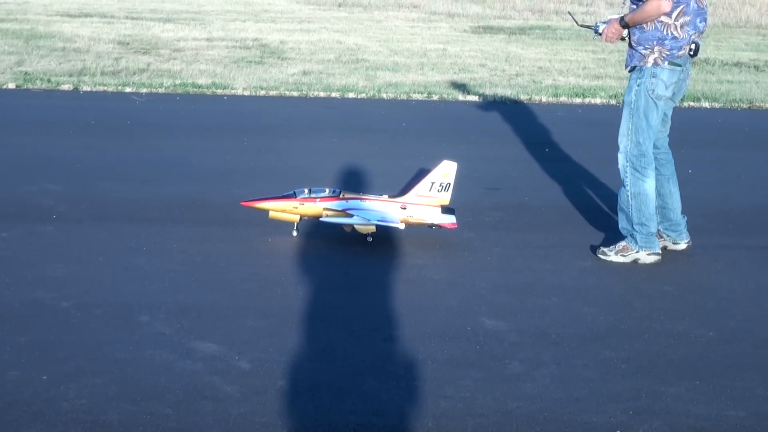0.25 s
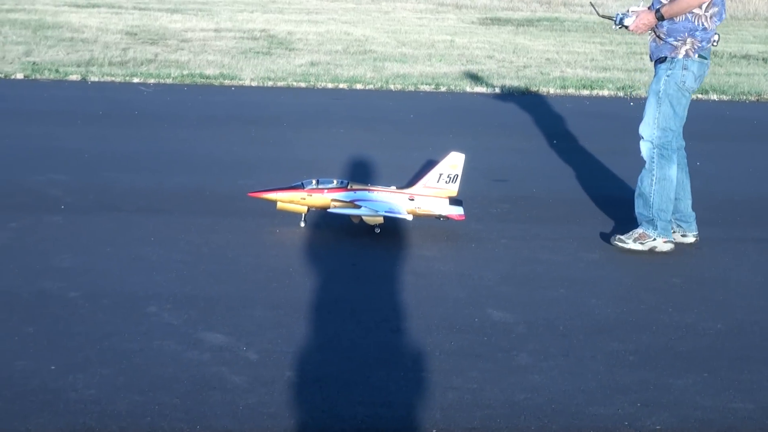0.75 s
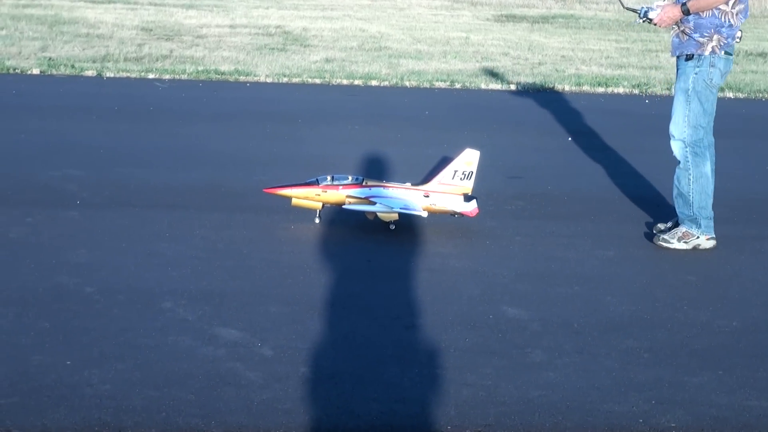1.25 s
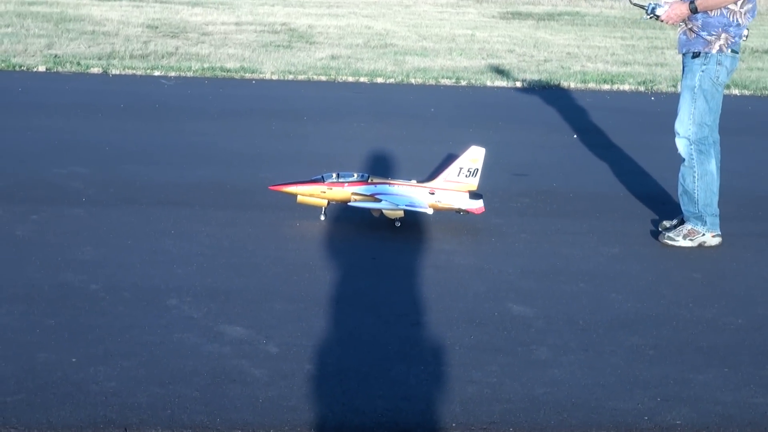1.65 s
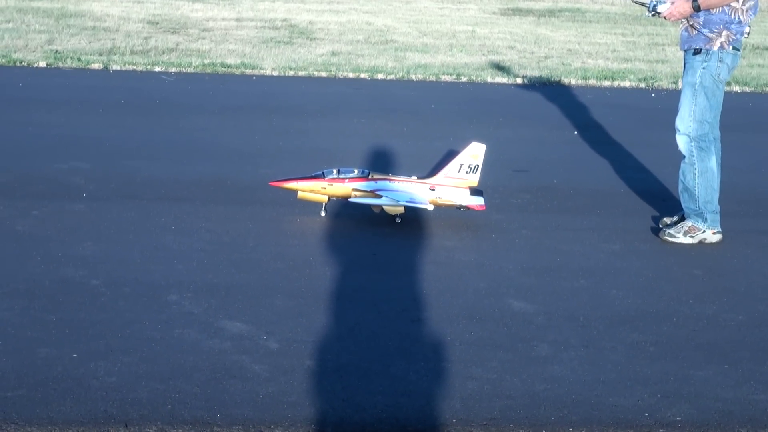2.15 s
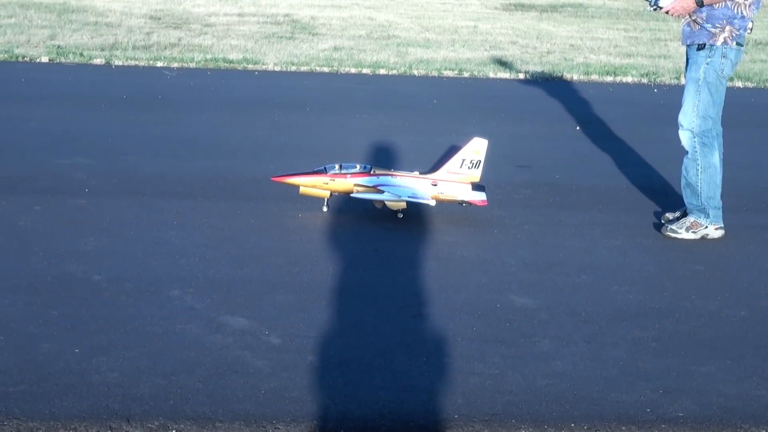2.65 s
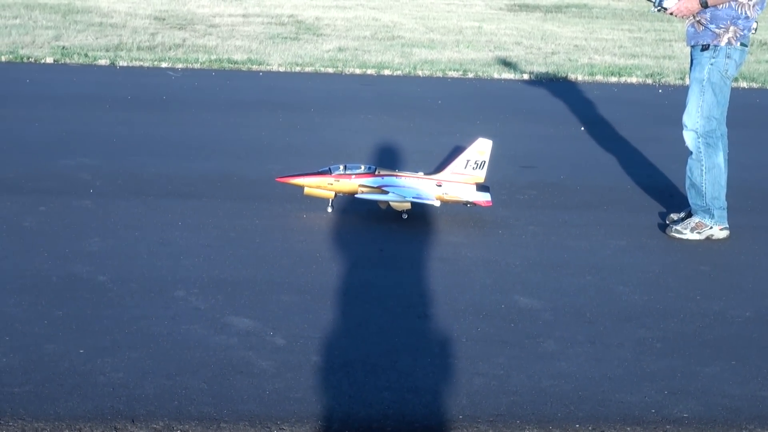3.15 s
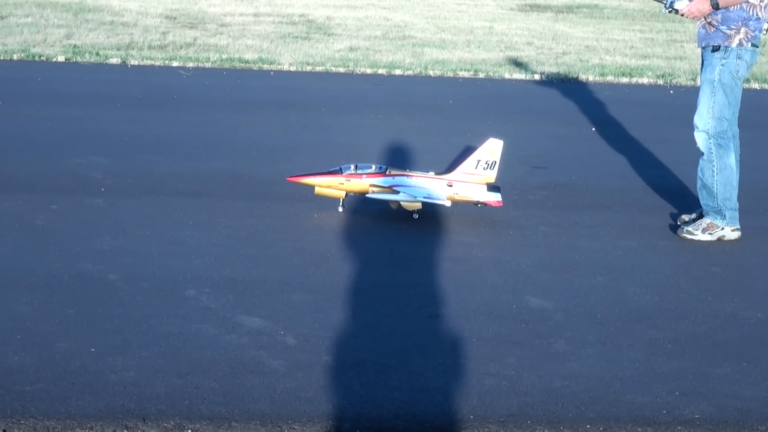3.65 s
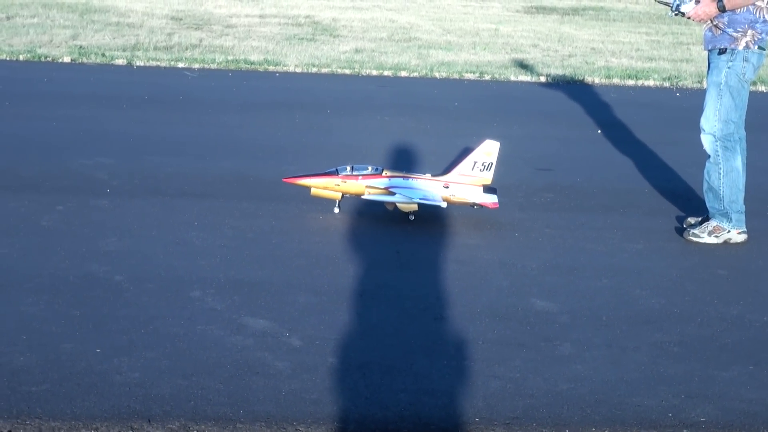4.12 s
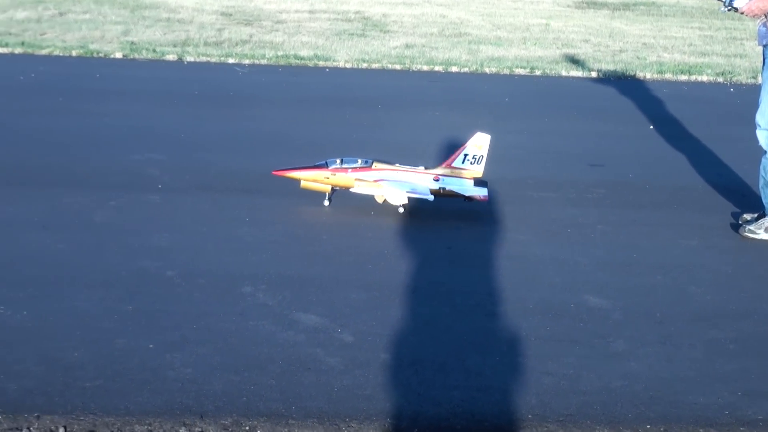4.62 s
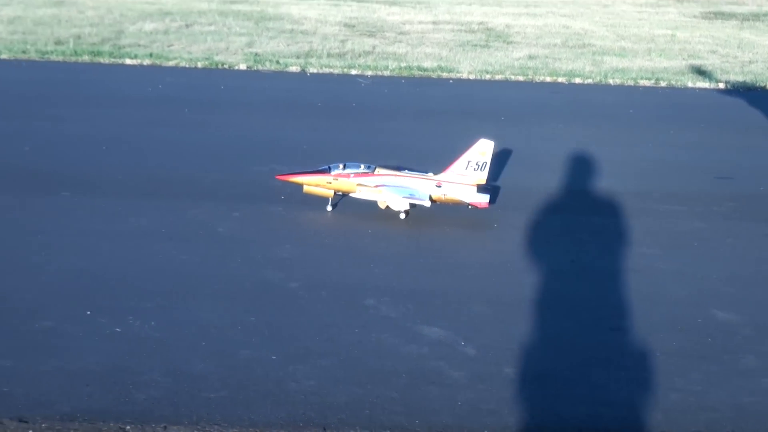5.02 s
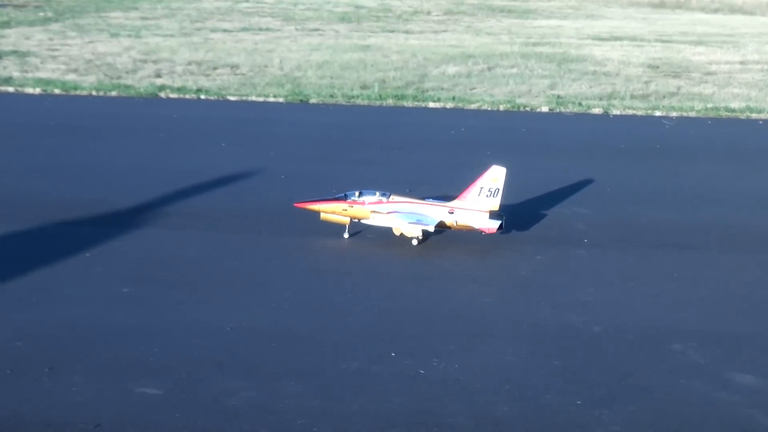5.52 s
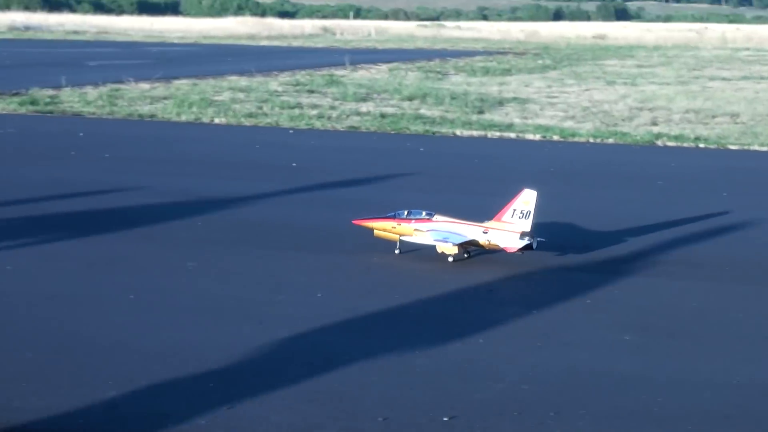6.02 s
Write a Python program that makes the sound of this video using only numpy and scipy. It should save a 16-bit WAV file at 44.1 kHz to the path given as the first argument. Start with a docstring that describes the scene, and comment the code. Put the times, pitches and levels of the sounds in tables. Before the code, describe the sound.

A soft, low camera hum close to the stereo microphone and a faint outdoor rush run throughout. A few metres away, a model jet's servos give one brief whirr at the very start, then a string of short, faint, squeaky gear buzzes from about 0.6 to 1.9 seconds, with four light linkage clicks between 1.3 and 1.9 seconds. Only the hum and quiet air remain until about 3.5 seconds, when the electric motor starts with a rapid stutter of high squeals, rattles and chirps. From 3.7 seconds the fan spools up, much louder than the servos: a whine of several tones that rises quickly, then climbs in steps over a swelling rush and hiss of air. It keeps growing higher and louder, with the middle of the sound softening slightly after 5.8 seconds as the jet rolls past. The fan is still whining at the end, around 6.3 seconds.

```python
"""Model jet on a runway

An electric ducted-fan jet stands a few metres from a humming camcorder's stereo microphone.
Its servos whirr through a control check; the motor stutters and chirps into step, then the
five-bladed fan spools up, whining over the rush of air in its duct, and the jet starts to roll."""
import sys
import numpy as np
from scipy.fft import rfft, irfft, next_fast_len
from scipy.io import wavfile
from scipy.ndimage import uniform_filter1d, map_coordinates

SR = 44100
rng = np.random.default_rng(int(sys.argv[2]) if len(sys.argv) > 2 else 0)


def inscribe(sig):
    """Save sig as 16-bit PCM at rate SR to the path in sys.argv[1].

    A 1-D sig is mono; a 2-D sig holds one channel per row.
    Samples are clipped to [-1, 1] before scaling.
    """
    pcm = np.round(np.clip(np.atleast_2d(sig).T, -1, 1) * 32767)
    wavfile.write(sys.argv[1], SR, pcm.astype(np.int16))


N = 276948
TIME = np.arange(N) / SR
CRUISE_HZ = 500  # shaft speed at which the fan's levels are set
HISS_DB, HISS_DB_PER_OCTAVE = -38.5, 20  # exhaust hiss at cruise, and its growth with speed
TURN_AWAY_S = 5.76  # the intake turns from the microphone as the jet rolls past

# shaft speed until the motor runs in step, then as the throttle opens in steps: t/s, f/Hz
FIRST_TURNS = [(3.525, 35.1), (3.587, 120.1), (3.612, 151.2)]
SPOOL_UP = [(3.66, 208.3), (3.74, 272.8), (3.82, 304.6), (3.969, 325.4), (4.16, 331.6), (4.28, 378.3),
            (4.409, 410.8), (4.58, 421), (4.721, 443.8), (5.03, 520.1), (5.4, 569.3), (5.58, 586.8),
            (5.64, 603.6), (5.697, 606.4), (5.77, 634), (5.87, 641.5), (6.0, 654), (6.05, 689.3),
            (6.16, 694), (6.19, 704), (6.28, 703.5)]
# how each part of the jet radiates the fan's tones: f/Hz, level at cruise/dB
AIRFRAME = [(220, -39), (330, -34.5), (395, -32), (425, -39), (445, -34), (490, -36.5), (513, -50),
            (555, -31), (595, -37), (635, -23), (705, -26.5)]
DUCT_MOUTH = [(620, -40), (760, -31.5), (880, -36), (1000, -51), (1200, -48), (1310, -38), (1450, -49),
              (1565, -37.5), (1650, -40.5), (1730, -41), (1916, -46.5), (2110, -45)]
INTAKE = [(1150, -41), (1320, -31.5), (1560, -27), (1800, -35.5), (2070, -25.5), (2190, -35.5), (2400, -28),
          (2620, -35), (2750, -31.5), (2920, -43), (3170, -35.5), (3520, -33)]
NOZZLE = [(3350, -49), (3720, -41.5), (4050, -56.5), (4850, -47), (5450, -58), (6050, -42.5), (6850, -45.5),
          (7350, -35), (8100, -45), (8750, -43), (9100, -33.5), (9600, -42), (9900, -40), (10350, -34.5)]
# weak tones of the uneven rotor: shaft multiple, level against the hiss before the duct/dB
ROTOR_TONES = [(7, -9.5), (9, -6.5)]
# tones that swell as the motor pulls: shaft multiple, level at cruise before the duct/dB
STRAIN_TONES = [(2, -52), (4, -53), (6, -47.5)]
# highest blade tones: shaft multiple, level against the hiss before the roll-off/dB
TOP_BLADE_TONES = [(20, -14.5), (25, -25), (30, -15)]
# the nozzle's roll-off for those tones: f/Hz, gain/dB
NOZZLE_ROLLOFF = [(12000, 0), (13000, -12), (14200, -5), (15500, -20)]
# resonances of the duct's air, fan unit, motor casing and servo cases: f/Hz, width/Hz, gain/dB
DUCT_MODES = [(845, 198, 6.5), (1412, 407, 7.5), (2094, 145, 3), (2683, 87, -2.5), (3400, 250, -7.5),
              (4710, 660, -8), (5850, 270, -10.5), (7200, 290, -7.5)]
FAN_UNIT_MODES = [(813, 70, 7), (1500, 200, 9), (2140, 170, 6), (2630, 120, 3), (3280, 100, -13),
                  (4360, 170, -6)]
CASING_MODES = [(1600, 1400, -14), (2230, 290, -3), (2720, 280, 1), (3420, 400, -6.5), (4640, 440, -8.5)]
SERVO_MODES = [(2020, 350, -4), (3740, 500, -2), (4950, 500, 5.5), (6240, 430, 7), (6940, 380, 5.5),
               (8000, 300, -1), (9130, 790, 4), (10000, 370, 0), (11300, 700, 1), (12650, 450, -4)]
# noise spectra of the exhaust and the quiet airfield: f/Hz, relative level/dB
EXHAUST_SPECTRUM = [(60, -45), (230, 2.5), (550, -0.5), (900, 8), (1200, -18), (3500, 7.5), (4800, -1.5),
                    (5500, -7.5), (6300, 2.5), (8200, 2), (10300, 4), (12500, -0.5), (13200, -19),
                    (13800, -6), (14600, -16), (15400, -14), (16200, -24)]
AIRFIELD_SPECTRUM = [(15, -58), (25, -19), (59, -14.5), (89, -11), (120, -10), (170, -8), (301, -11),
                     (344, -11.5), (405, -11.5), (463, -9.5), (695, -16.5), (2840, -30), (4610, -33.5),
                     (9000, -38), (12500, -38), (16000, -41)]
# speed controller's current bursts: t/s, length/s, first f/Hz, last f/Hz, squeal/dB, rattle/dB
CURRENT_BURSTS = [(3.476, 0.0065, 3000, 2920, -40.5, -41), (3.484, 0.02, 2980, 2960, -51.5, -61),
                  (3.505, 0.035, 3020, 3000, -42, -33.5), (3.54, 0.02, 3070, 3100, -41, -35.5),
                  (3.559, 0.022, 3370, 3350, -32, -39), (3.577, 0.0176, 3925, 3904, -40.5, -40),
                  (3.596, 0.0205, 4980, 4950, -38.5, -32.5), (3.615, 0.023, 3750, 3720, -54, -35.5),
                  (3.616, 0.017, 4680, 4220, -43, -43), (3.633, 0.025, 3300, 3470, -53, -38.5),
                  (3.658, 0.042, 2050, 2260, -47, -50)]
# how the windings radiate the squeal's harmonics: f/Hz, highest level/dB
WINDINGS = [(4600, -69), (6050, -48.5), (6800, -82), (7500, -48), (7900, -56), (8950, -60.5),
            (10000, -56.5), (10700, -68), (11700, -48), (12100, -74), (15000, -85)]
# control check: start t/s, fastest t/s, end t/s, top mesh f/Hz, whirr/dB, rasp/dB, airframe buzz/dB
SERVO_MOVES = [(-.04, 0.033, .082, 1684, -54.5, -57.5, -63),
               (0.609, 0.661, 0.72, 1583, -58.5, -56.5, -60.5),
               (0.748, 0.816, 0.9, 2490, -53, -54.5, -55.5), (.967, 1.044, 1.11, 2520, -54, -56.5, -55.5),
               (1.12, 1.172, 1.24, 1700, -55, -59.5, -58), (1.194, 1.248, 1.283, 1094, -54.5, -61.5, -58),
               (1.337, 1.374, 1.395, 1680, -65, -67, -63), (1.384, 1.452, 1.564, 2690, -61, -56.5, -53),
               (1.629, 1.733, 1.79, 1263, -59, -59, -54.5), (1.801, 1.855, 1.895, 2200, -63.5, -61, -55)]
# servo gear tones: mesh multiple, relative level/dB
GEAR_TONES = [(1, -1), (2, 1), (3, -4), (4, 6.5), (5, -6), (6, 2.5), (7, -20), (8, -7), (10, -6)]
# linkages reach the end of their travel: t/s, level/dB
LINKAGE_STOPS = [(1.262, -52), (1.483, -42), (1.772, -47.5), (1.877, -40.5)]
# hum of the camcorder's drive, right by the microphone: t/s, level/dB
HUM_SWELL = [(0.0, -48.5), (0.6, -49), (1.4, -52.5), (2.3, -50.5), (3.4, -52), (4.2, -47.5), (6.28, -48.5)]
# its harmonics: multiple, level against the hum/dB
HUM_TONES = [(1, -0.5), (2, -17.5), (3, -13), (4, -15.5)]
# its gearing: f/Hz, level/dB
DRIVE_WHINE = [(510, -71.5), (571, -80), (2439, -80.5)]
# a whine that dies away: t/s, level/dB
FADING_WHINE = [(0, -75), (.8, -73), (1.6, -85), (3.4, -88)]
# a thin idle whistle that sags in pitch: t/s, f/Hz
WHISTLE_PITCH = [(0, 2970), (.8, 2980), (1.9, 2860), (3.4, 2890)]
# its harmonics: multiple, level/dB
WHISTLE_TONES = [(1, -77.5), (2, -82)]
# stereo image of the jet and of the camcorder's own sounds: f/Hz, side/dB, left over right/dB
JET_IMAGE = [(290, -15, 0.5), (650, -23, -0.5), (1800, -24, -1.2), (5000, -20, -0.7), (9000, -18.5, 0)]
NEAR_IMAGE = [(123, -60, 0.5), (556, -4, 2.5), (4900, -1.5, -0.1)]


def fan_tones(growth_db_per_octave=11.5, strain_db_per_octave=14.5, hard_pull_octaves_per_s=0.96):
    """Rotor imbalance sings at shaft speed, the blades at its multiples, swelling at each resonance."""
    shaft_hz, octaves = shaft_speed()
    shaft = angle(shaft_hz)
    hiss_db = HISS_DB + HISS_DB_PER_OCTAVE * octaves
    acceleration = uniform_filter1d(np.gradient(octaves) * SR, size=4000)
    pull = np.tanh(acceleration / hard_pull_octaves_per_s)
    blur = 0.068 * amp(-11 * octaves)  # the blades meet rougher air at low speed

    def harmonic(k):
        return tone(k * (shaft + blur * wobble(110) * min(k / 10, 1) ** .5))

    def radiated(path, k):
        return colour(path, k * shaft_hz) * flicker(1.85, 45) * harmonic(k)

    airframe = colour(AIRFRAME, shaft_hz) * flicker(0.83, 30) * tone(shaft)
    intake = turning_away(db_per_s=13) * radiated(INTAKE, 5)
    nozzle = flicker(3, 22) * radiated(NOZZLE, 10)
    nozzle += amp(-5.5) * flicker(3, 22) * radiated(NOZZLE, 15)
    mouth = flicker(3, 22) * radiated(DUCT_MOUTH, 3)
    out = amp(growth_db_per_octave * octaves) * (airframe + mouth + intake + nozzle)
    uneven = sum(amp(hiss_db + db) * flicker(3.5, 7.7) * harmonic(k) for k, db in ROTOR_TONES)
    out += duct(uneven, narrowing=1.8)
    strain = sum(amp(db) * flicker(3.5, 12) * harmonic(k) for k, db in STRAIN_TONES)
    swell = amp(strain_db_per_octave * octaves + 4 * pull)
    out += duct(turning_away(db_per_s=13) * swell * strain)
    for k, db in TOP_BLADE_TONES:
        out += amp(hiss_db + db) * flicker(3.5, 25) * colour(NOZZLE_ROLLOFF, k * shaft_hz) * harmonic(k)
    return out * gate(3.68, 5, 0.018)


def airflow(roar_db=-34, roar_db_per_octave=12.5):
    """Turbulence roars in the duct and hisses from the nozzle; the hiss grows faster with speed."""
    _, octaves = shaft_speed()
    roar = amp(roar_db + roar_db_per_octave * octaves) * unit(duct(rng.standard_normal(N)))
    hiss_gain = amp(HISS_DB + HISS_DB_PER_OCTAVE * octaves) * flicker(0.51, 25)
    hiss = hiss_gain * tailpipe(noise(EXHAUST_SPECTRUM))
    return (turning_away(db_per_s=8.5) * roar + hiss) * gate(3.52, 5, 0.027)


def shaft_speed():
    """The fan's speed in Hz, and in octaves above cruise."""
    hz, = curves(np.vstack([FIRST_TURNS, SPOOL_UP]))
    return hz, np.log2(hz / CRUISE_HZ)


def turning_away(db_per_s):
    """Falling gain as the intake turns from the microphone."""
    return amp(-db_per_s * np.maximum(TIME - TURN_AWAY_S, 0))


def duct(x, narrowing=1, top_hz=8500):
    """The air in the duct rings; its bends hold back the treble."""
    return filtered(ring(x, DUCT_MODES, narrowing), lambda hz: 1 / (1 + (hz / top_hz) ** 6))


def tailpipe(x, echo_s=0.000742, echo_db=-12.5):
    """The open end's inverted echo hollows the hiss; the dips wander with the flow."""
    delay = echo_s * (1 + 0.018 * wobble(5))
    return unit(x - amp(echo_db) * map_coordinates(x, [(TIME - delay) * SR]))


def motor_start():
    """Bursts of switched current squeal in the windings and jolt the rotor into step."""
    out = cogging()
    rattle = rotor_rattle()
    waver = .25 * wobble(400)
    for start, length, from_hz, to_hz, squeal_db, rattle_db in CURRENT_BURSTS:
        burst = gate(start, length, .002)
        now = burst > 0
        hz = np.interp(TIME[now], [start, start + length], [from_hz, to_hz])
        phase = angle(hz) + waver[now]
        squeal = amp(squeal_db) * tone(phase)
        for k, db in (2, 0), (3, -8):
            squeal += np.minimum(colour(WINDINGS, k * hz), amp(squeal_db + db)) * tone(k * phase)
        out[now] += burst[now] * (squeal + amp(rattle_db) * rattle[now])
    return out


def cogging(slots=9, hold_until_s=3.586, fall_db_per_s=73):
    """Magnets pull past the slots: a rising tone that chirps at each resonance of the casing."""
    slot_hz = slots * shaft_speed()[0]
    casing = sum(amp(db) / (1 + (2 * (2 * slot_hz - centre) / width) ** 2) ** 1.74
                 for centre, width, db in CASING_MODES)
    # strong while the starting current flows, then dying
    level_db = -27 - fall_db_per_s * np.maximum(TIME - hold_until_s, 0) + wobble(200)
    phase = angle(slot_hz)
    return amp(level_db) * casing * (tone(2 * phase) + amp(-9) * tone(phase)) * gate(3.525, .275, .01)


def rotor_rattle(jolts_per_s=480, decay_s=0.0015, low_hz=690, top_hz=5160):
    """Uneven jolts ring the fan unit; the duct passes the middle of the rattle."""
    count = np.cumsum(jolts_per_s * np.exp(.4 * wobble(300))) / SR
    age_s = (count % 1) / jolts_per_s
    jolts = np.exp(-age_s / decay_s) * flicker(0.8, 170) * rng.standard_normal(N)
    band = lambda hz: 1 / np.sqrt(1 + (hz / top_hz) ** 6 + (low_hz / (hz + 1)) ** 10)
    return unit(filtered(ring(jolts, FAN_UNIT_MODES), band))


def servos(slowest=0.3, hold_s=.02):
    """Geared motors dart and brake: tones squeak through case resonances, teeth buzz the airframe."""
    out = np.zeros(N)
    rasp = unit(filtered(ring(tooth_clicks(), SERVO_MODES), lambda hz: 1 / (1 + (hz / 13300) ** 16)))
    buzz = unit(duct(tooth_clicks(), narrowing=0.91))
    scrape = flicker(1.26, 250)
    hunting = 1 + .04 * wobble(85)
    partials = [(k, amp(db) * flicker(4, 130)) for k, db in GEAR_TONES]
    slack = 1 + .12 * rng.standard_normal(N)  # play in the gears smears each tone
    case = lambda hz: np.abs(resonance(SERVO_MODES, hz)) / (1 + (hz / 12000) ** 10)
    for start, fastest, end, mesh_hz, whirr_db, rasp_db, buzz_db in SERVO_MOVES:
        now = (TIME > start) & (TIME < end)
        knots_s = [start, fastest - hold_s / 2, fastest + hold_s / 2, end]
        effort = np.interp(TIME[now], knots_s, [0, 1, 1, 0])
        hz = mesh_hz * (slowest + (1 - slowest) * effort) * hunting[now]
        mesh = angle(hz * slack[now])
        whirr = sum(gain[now] * case(k * hz) * tone(k * mesh) for k, gain in partials)
        # the tones build up with speed and stand out as the motor brakes
        whirr *= np.clip((TIME[now] - start) / (fastest - start), 0, 1) ** 0.88
        gears = amp(whirr_db) * unit(whirr) + amp(rasp_db) * rasp[now] + amp(buzz_db) * buzz[now]
        out[now] += effort ** 0.56 * scrape[now] * gears
    return out


def tooth_clicks(per_s=5000, scatter_db=5):
    """Teeth click at random in the play of the gears."""
    hits = rng.random(N) < per_s / SR
    return hits * rng.choice([-1, 1], N) * amp(scatter_db * rng.standard_normal(N))


def linkages(t60_s=0.031):
    """A linkage that hits its stop knocks the airframe."""
    knock = noise([(700, -15), (1400, 11), (3500, -16), (8000, -30), (15000, -48)])
    return knock * sum(gate(start, .1, 0.00083) * amp(db - 60 * np.abs(TIME - start) / t60_s)
                       for start, db in LINKAGE_STOPS)


def camcorder(drive_hz=117.35, fading_hz=1634):
    """Right by the microphone the drive hums and its gearing whines, with a thin whistle."""
    drive = angle(drive_hz * (1 + 0.00323 * wobble(3)))
    hum = sum(amp(db) * flicker(min(k - 1, 2), 6.3) * tone(k * drive) for k, db in HUM_TONES)
    whine = sum(amp(db) * flicker(0.86, 1.94) * tone(drive * hz / drive_hz) for hz, db in DRIVE_WHINE)
    whine += amp(curves(FADING_WHINE)[0]) * tone(drive * fading_hz / drive_hz)
    phase = angle(curves(WHISTLE_PITCH)[0] * (1 + 0.0169 * wobble(160)))
    whistle = sum(amp(db) * flicker(1.7, 5.7) * tone(k * phase) for k, db in WHISTLE_TONES)
    return amp(curves(HUM_SWELL)[0]) * hum + whine + whistle


def airfield(level_db=-56.7, side_db=-15):
    """The quiet of the place: a low rush, and a fainter one for the sides."""
    gain = amp(level_db) * flicker(0.33, 3.91)
    return gain * noise(AIRFIELD_SPECTRUM), gain * amp(side_db) * noise(AIRFIELD_SPECTRUM)


def microphone_pair(x, image):
    """Closely spaced capsules: small phase and level differences that vary with frequency."""
    image = np.asarray(image)
    knots_hz = np.geomspace(30, SR / 2, 60)
    signs = rng.choice([-1, 1], len(knots_hz))
    skew = lambda hz: np.tanh(10 * np.interp(hz, knots_hz, signs))
    side = filtered(x, lambda hz: 1j * skew(hz) * colour(image[:, :2], hz))
    lean = lambda hz: np.sqrt(colour(image[:, ::2], hz))
    return np.array([filtered(x + side, lean), filtered(x - side, lambda hz: 1 / lean(hz))])


def amp(db):
    """Decibels to gain."""
    return 10 ** (np.asarray(db) / 20)


def unit(x):
    """Scale to rms 1."""
    return x / np.sqrt(np.mean(x ** 2) + 1e-20)


def curves(rows):
    """One value per sample for each column after the time."""
    times, *columns = np.transpose(rows)
    return [np.interp(TIME, times, column) for column in columns]


def wobble(rate):
    """A smooth random curve, rate knots a second."""
    return map_coordinates(rng.standard_normal(int(N * rate / SR) + 4), [TIME * rate])


def flicker(db, rate):
    """A gain that wanders by about db, rate knots a second."""
    return amp(db * wobble(rate))


def filtered(x, response):
    """x times a response of frequency."""
    size = next_fast_len(N + SR // 4)
    return irfft(rfft(x, size) * response(np.fft.rfftfreq(size, 1 / SR)), size)[..., :N]


def colour(points, hz):
    """Gain of (f/Hz, level/dB) points, read on a log axis."""
    f, db = np.transpose(points)
    return amp(np.interp(np.log(hz + 1), np.log(f), db))


def noise(points):
    """Noise of rms 1 with the given spectrum."""
    return unit(filtered(rng.standard_normal(N), lambda hz: colour(points, hz)))


def resonance(modes, hz, narrowing=1):
    """Response of resonances at hz, their widths divided by narrowing."""
    jf = 1j * hz / narrowing
    return sum(amp(db) * jf * width / (centre ** 2 - hz ** 2 + jf * width) for centre, width, db in modes)


def ring(x, modes, narrowing=1):
    """Ring x through resonances."""
    return filtered(x, lambda hz: resonance(modes, hz, narrowing))


def angle(hz):
    """Phase of something that turns at hz."""
    return 2 * np.pi * np.cumsum(hz) / SR


def tone(phase):
    """A sine of rms 1 with a random start."""
    return np.sqrt(2) * np.sin(phase + rng.uniform(0, 2 * np.pi))


def gate(start, length, edge):
    """1 during a stretch of time, with ramps edge seconds long."""
    return np.clip(np.minimum(TIME - start, start + length - TIME) / edge + .5, 0, 1)


def scene():
    """The jet a few metres off, the camcorder at the microphone, the airfield all around."""
    jet = fan_tones() + airflow() + motor_start() + servos() + linkages()
    out = microphone_pair(jet, JET_IMAGE)
    drive = camcorder()
    rush, side = airfield()
    return out + microphone_pair(drive + rush, NEAR_IMAGE) + [side, -side]


def record(dry):
    """The camcorder keeps nothing above its band limit."""
    return filtered(dry, lambda hz: hz < 16300)


dry = scene()
out = record(dry)
inscribe(out)
```